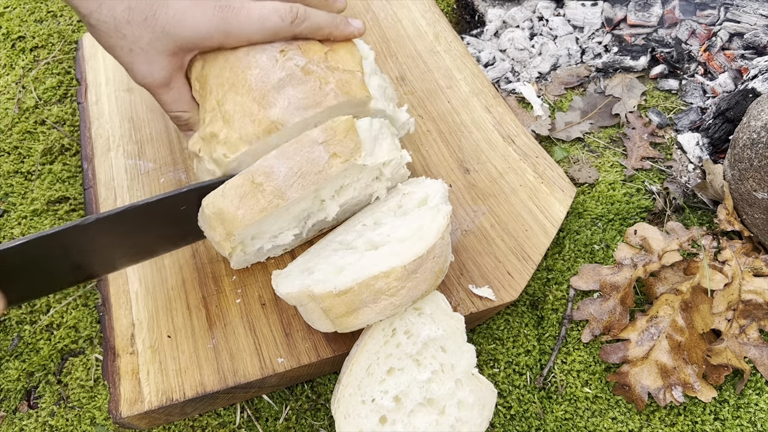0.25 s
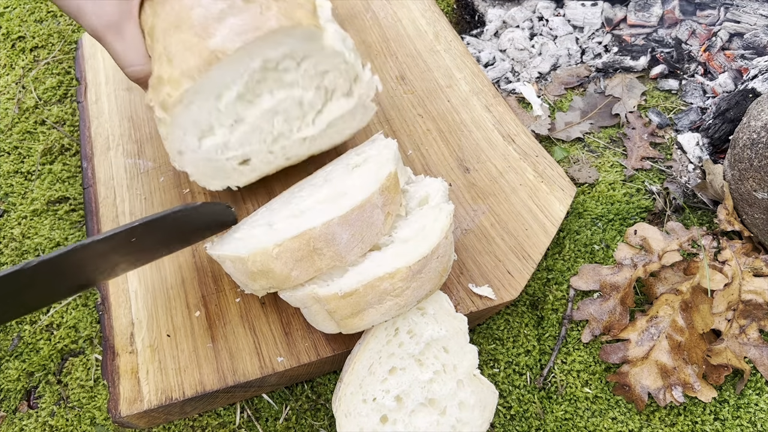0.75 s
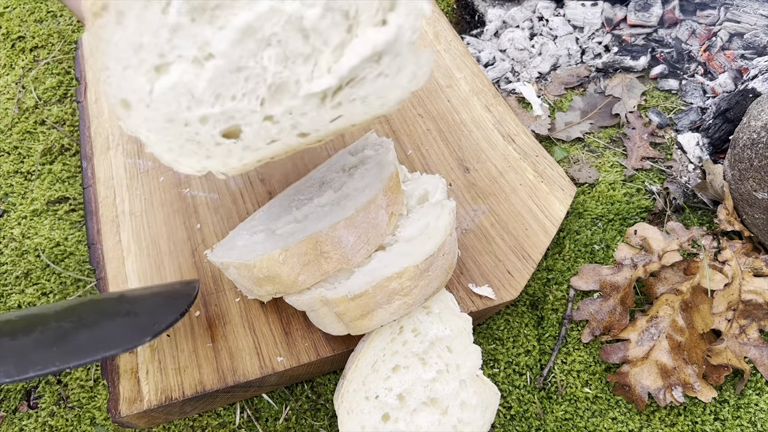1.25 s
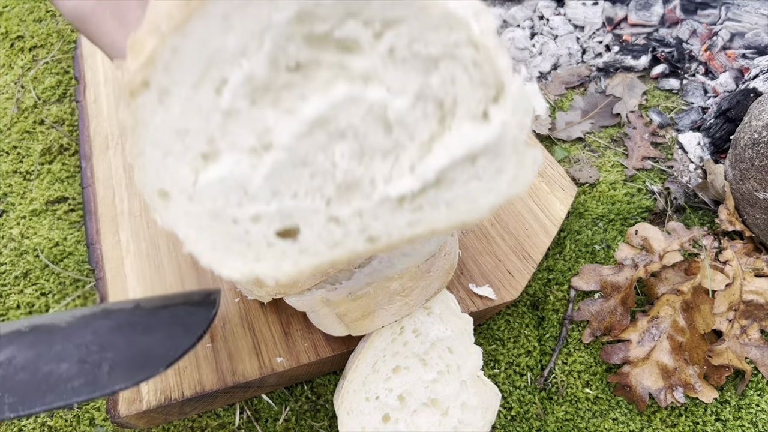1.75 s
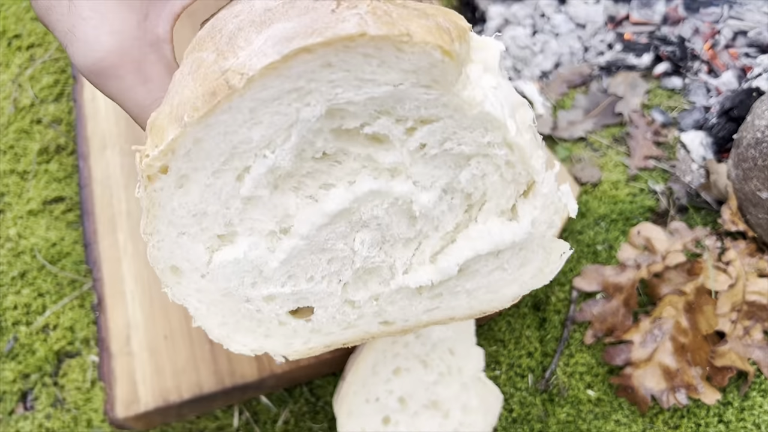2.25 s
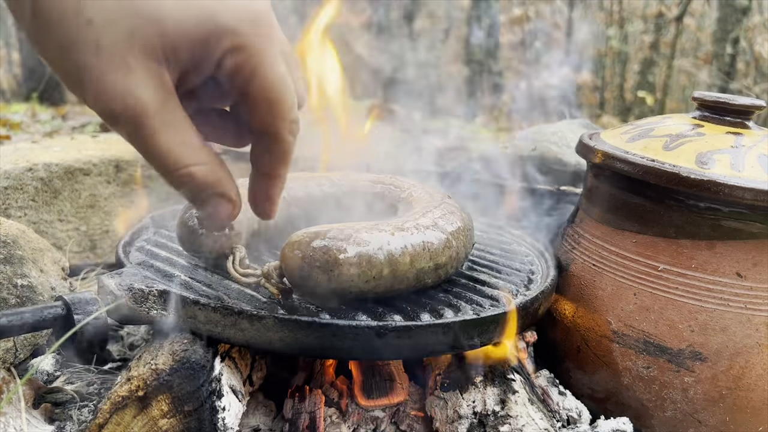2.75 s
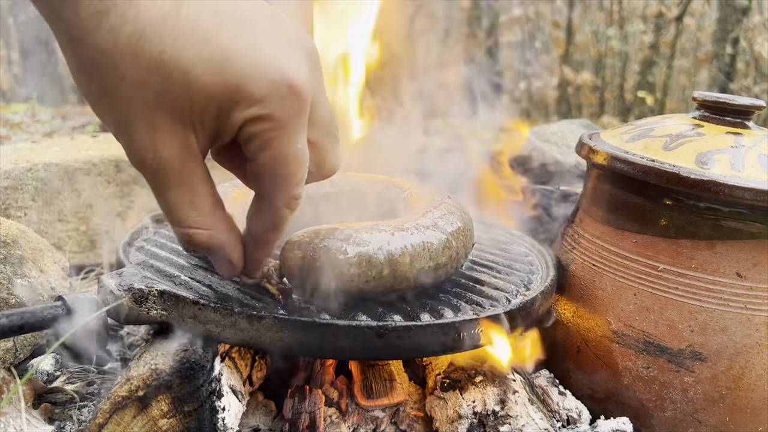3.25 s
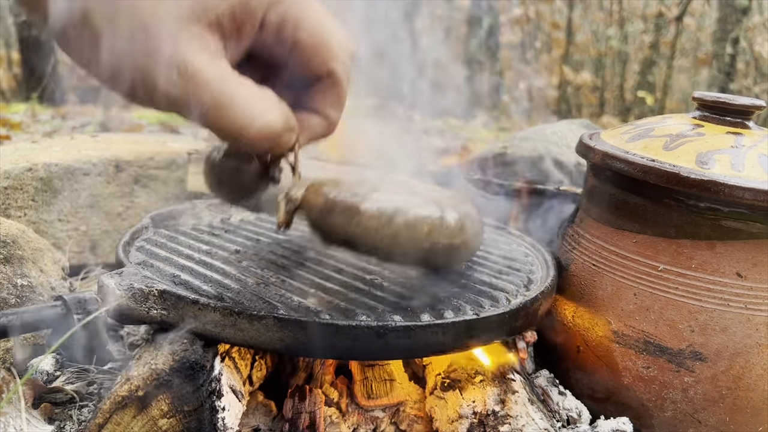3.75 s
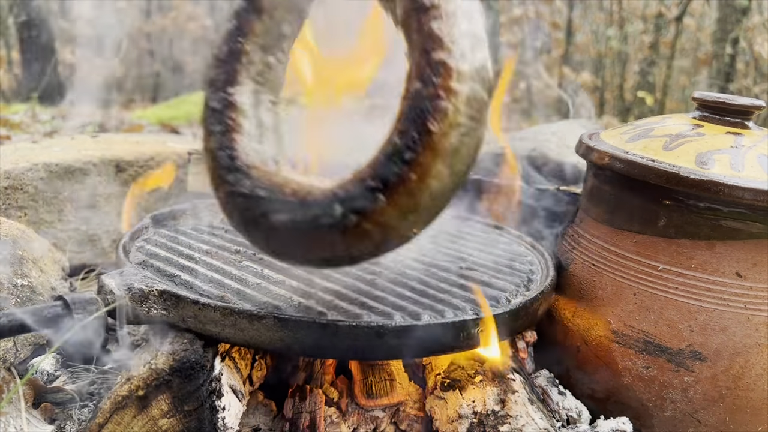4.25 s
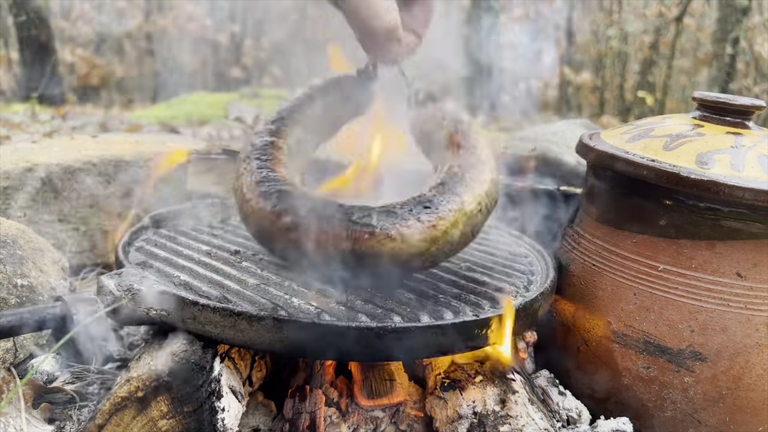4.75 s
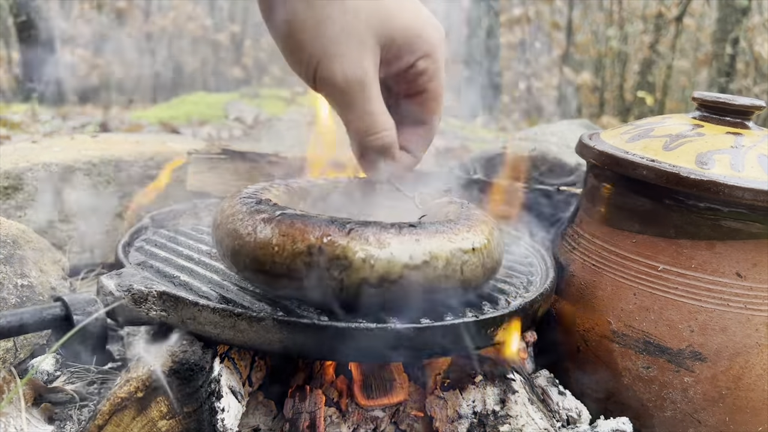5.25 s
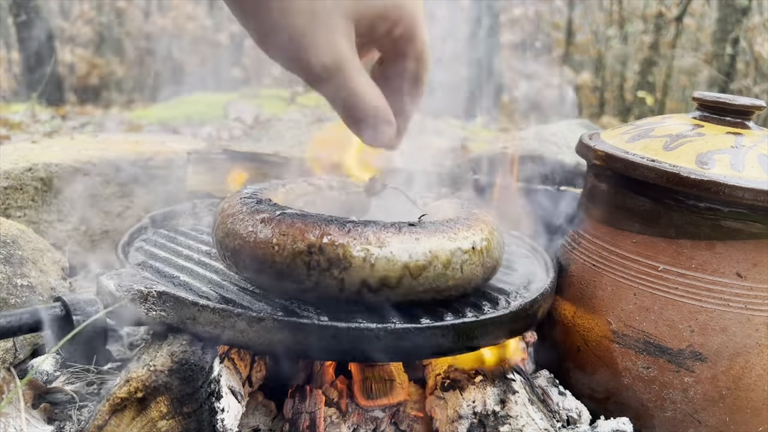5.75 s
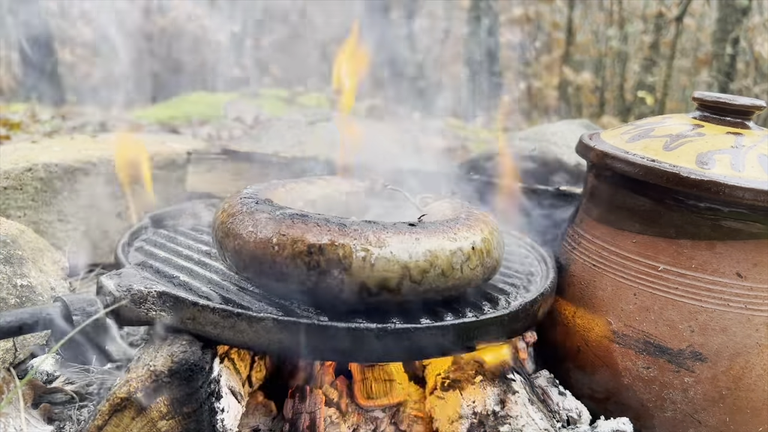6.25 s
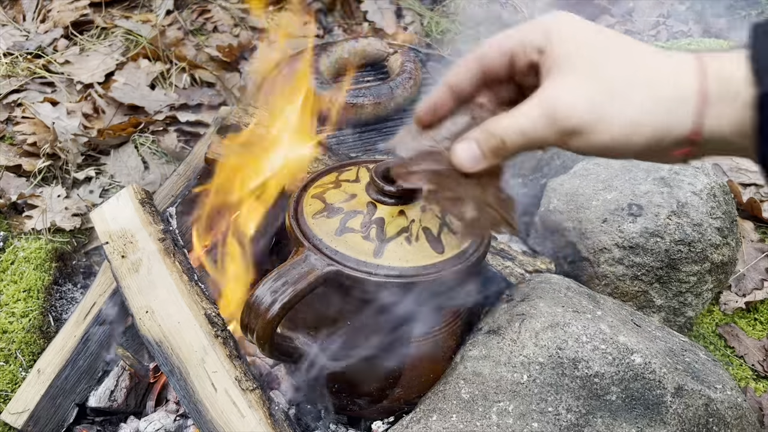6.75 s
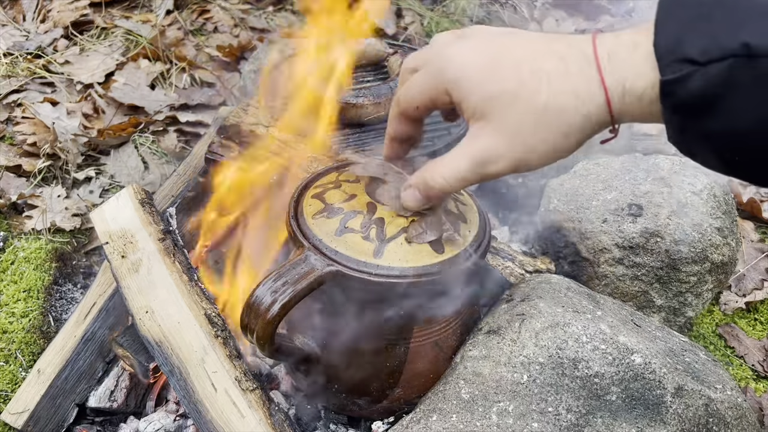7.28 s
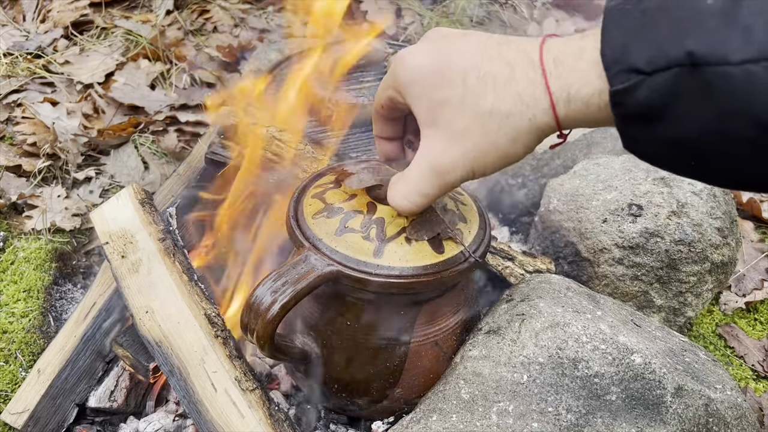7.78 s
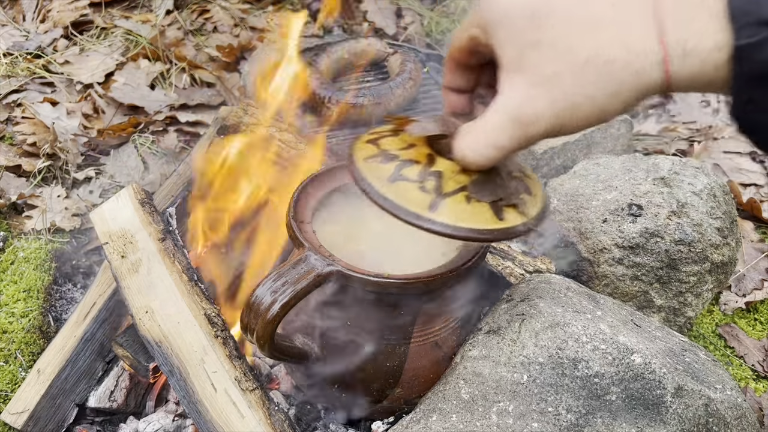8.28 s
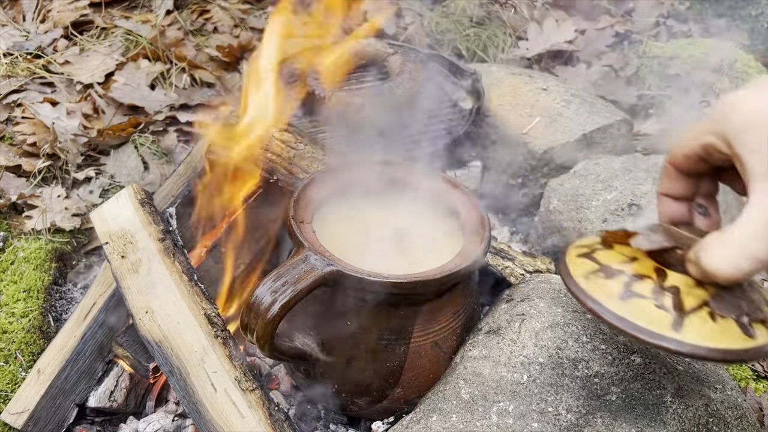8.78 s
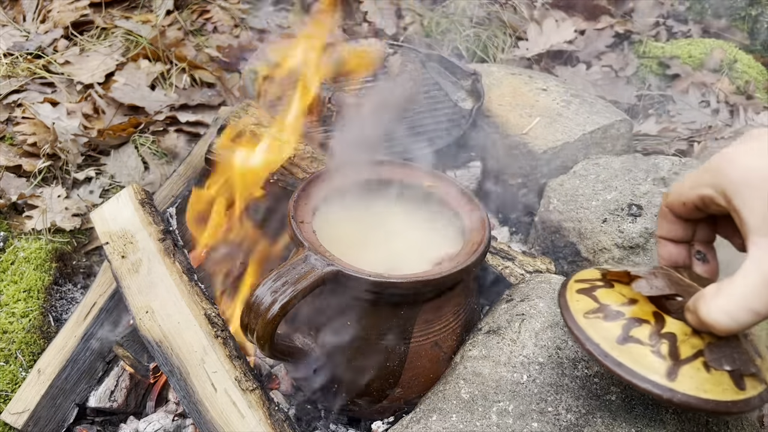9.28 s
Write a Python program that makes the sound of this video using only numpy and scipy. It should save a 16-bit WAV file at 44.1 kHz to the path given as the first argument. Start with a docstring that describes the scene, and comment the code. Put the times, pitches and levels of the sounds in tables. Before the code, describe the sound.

Three close, dry outdoor scenes in wide stereo. From 0 to 2.3 s a knife rasps through a crusty loaf, strongest in the first 0.3 s, with low rubbing on wood, soft bumps around 0.3-0.6 and near 1 s, and bright brittle crackling with sharp snaps continuing as the bread is lifted. At 2.3 s it cuts to a sausage on a griddle: dense bright fizz, coarse spatter and quick spurts, busiest around 3-3.6 s and again near 4.1 s, pops at 3.0, 3.4 and 4.4, a flame flap at 4.5, a steam hiss at 5.0-5.1 as it is laid down, then fading sizzle with spits and pops near 6 s. From 6.4 s a deeper fluttering fire rumbles under steady thin wood hiss, with scattered pops, a heavy crack at 7.6, a cluster with a flame puff as the lid lifts at 8.3, and tiny bubbles near 8.0, 9.0 and 9.4 s.

```python
"""Bread and sausage by a wood fire

Three scenes. A knife saws through a crusty loaf, the slice flops over and the crust crackles on: grains and rasps.
A sausage is turned on a hot griddle over a wood fire, its fat fizzing and spitting: grained noise, spurts and steam.
Then the fire alone rumbles, hisses and pops around a clay pot: fluttering noise, ticks and sharp fractures.
A few bubbles ring in the pot; the fire has short echoes, and both places are spread in stereo."""
import sys
import numpy as np
from scipy import signal
from scipy.fft import rfft, irfft, next_fast_len
from scipy.io import wavfile

SR = 44100
rng = np.random.default_rng(int(sys.argv[2]) if len(sys.argv) > 2 else 0)


def int16_out(signal):
    """Quantize to a 16-bit WAV file."""
    q = np.round(np.clip(np.atleast_2d(signal).T, -1, 1) * 32767)
    wavfile.write(sys.argv[1], SR, q.astype(np.int16))


N = 419832

# Start and end in seconds.
BREAD_SPAN_S, GRIDDLE_SPAN_S, POT_SPAN_S = (0, 2.305), (2.305, 6.376), (6.376, 9.53)
EDGE_HZ = 15850

# Crackling crust, loudest as the blade breaks through and as the loaf is gripped and lifted.
# Each row: time in seconds, level in dB before CRUST_LIFT_DB.
CRUST_LEVEL = [(0, -34), (.12, -43), (.44, -38), (.72, -36), (.87, -42), (1.18, -41), (1.44, -38.5),
               (1.6, -41.5), (1.78, -38), (1.98, -40.5), (2.29, -39.5)]
# Spectra of crust, crumb, blade and board. Each row: frequency in Hz, relative density in dB per Hz.
CRUST_SPECTRUM = [(2000, -29), (4200, -19.5), (6200, -17.5), (7600, -7.5), (8800, -6), (9800, -4.5),
                  (11500, -0.5), (13000, -8.5), (15700, -4)]
CRUMB_SPECTRUM = [(400, -12.5), (750, -13.5), (1400, -2.5), (2000, -1), (3000, 0), (4300, 0), (6500, 0.5),
                  (9000, -6.5)]
RASP_SPECTRUM = [(300, -14), (600, -12.5), (720, -4.5), (820, -4.5), (950, -12), (1200, -25), (2000, -13.5),
                 (3000, -33)]
RUB_SPECTRUM = [(20, -23), (45, 0), (80, -4), (150, -10.5), (350, -14), (600, -17.5), (1200, -11.5)]
# Strokes of the blade. Each row: start in seconds, length in seconds, level of the rasp in dB.
BLADE_STROKES = [(-.02, .3, -53), (0.55, 0.14, -63.5)]
STROKE_RISE_S, STROKE_FALL_DB_PER_S = 0.017, 110
CRUST_LIFT_DB = 5.0
# The loaf rubs on the board until the slice comes free, then settles in the hand.
FREE_S, RUB_DB, SETTLE_DB_PER_S, REST_DB = 0.54, -57, 15.5, -74
CRUMB_DB, CRUMB_FADE_DB_PER_S = -51, 2


def bread():
    """Crust crumbles in fine grains over rustling crumb; the blade rasps and the loaf rubs on the board."""
    t = times(BREAD_SPAN_S)
    flakes = grains(t, per_s=1100, spread_db=0.5, ring_s=0.00056, bed=0.16, shared=0.28)
    flakes = flakes * waver(t, per_s=46, depth_db=1.22)
    crust = amp(CRUST_LIFT_DB) * level(CRUST_LEVEL, t) * coloured(flakes, CRUST_SPECTRUM)

    fibres = grains(t, per_s=700, spread_db=3.0, ring_s=0.0012, bed=0.17, shared=0.81)
    fibres = patchy(fibres, width_hz=400, per_s=14, depth_db=1.8)
    crumb = held(t, CRUMB_DB, FREE_S, CRUMB_FADE_DB_PER_S) * coloured(fibres, CRUMB_SPECTRUM)

    slips = grains(t, per_s=410, spread_db=1, ring_s=.003, bed=0.93, shared=0.43)
    sawing = 0
    for s, length_s, db in BLADE_STROKES:
        rise = np.clip((t - s) / STROKE_RISE_S, 0, 1)
        sawing = sawing + rise * held(t, db, s + length_s, STROKE_FALL_DB_PER_S)
    blade = sawing * coloured(slips, RASP_SPECTRUM)

    rubbing = np.hypot(held(t, RUB_DB, FREE_S, SETTLE_DB_PER_S), amp(REST_DB))
    rubbing = rubbing * waver(t, per_s=7.4, depth_db=3.0)
    rub = rubbing * coloured(rng.standard_normal((2, len(t))), RUB_SPECTRUM)
    return t[0], crust + crumb + blade + rub


# Bread bumping on the board.
# Each row: centre in seconds, gain in dB, brightness as a factor on the thud's frequencies.
BOARD_BUMPS = [(.299, -9, 0.49), (0.434, -13, .4), (0.568, -6.5, 1.8), (.95, -11, .25), (1.096, -9, .25)]
# Each row: frequency in Hz, gain in dB.
THUD_RESPONSE = [(25, -12), (60, 3), (130, 2), (300, 3), (480, -5), (800, -15), (2000, -24), (6000, -26)]


def thud(s, db, brightness, size=2048):
    """A soft push of air with no ring."""
    push = np.outer([1, 0], signal.unit_impulse(size, "mid"))
    return s - size / 2 / SR, filtered(push, lambda hz: amp(db + read(THUD_RESPONSE, hz / brightness)))


# Frying fat swells as the sausage is gripped, lifted and laid down again, then dries off.
# Each row: time in seconds, fine fizz in dB before FIZZ_LIFT_DB, coarse spatter in dB before SPATTER_LIFT_DB.
FRYING_LEVEL = [(2.33, -34.5, -43), (2.36, -35.5, -47.5), (2.95, -32, -47), (3.03, -31.5, -44),
                (3.07, -32.5, -44), (3.59, -30, -44), (3.69, -36, -45), (4.15, -32.5, -35.5),
                (4.25, -36.5, -44.5), (4.58, -36.5, -43.5), (4.9, -38, -51), (5.12, -29.5, -52),
                (5.18, -33, -44), (5.9, -44.5, -53), (6.0, -42, -48), (6.014, -43.5, -51), (6.37, -46, -51)]
# Spectra. Each row: frequency in Hz, relative density in dB per Hz.
FIZZ_SPECTRUM = [(500, -23.5), (1000, -22.5), (1900, -19), (2600, -14.5), (3400, -12), (4200, -13),
                 (4900, -7), (6000, -4.5), (6700, -6.5), (8000, -1), (9300, -6), (11500, 1), (13000, -7),
                 (15700, -2)]
SPATTER_SPECTRUM = [(300, -12.5), (500, -6.5), (700, -9.5), (1200, -7.5), (1900, -5.5), (2600, -1),
                    (3400, 3), (4200, -2.5), (5000, 1.5), (5800, -8.5), (6700, -3), (8000, -5),
                    (15000, -29)]
# Big spurts of fat flashing to steam.
# Each row: centre in seconds, half-length to 1/e of the power in seconds, level in dB before spectral shaping.
BIG_SPURTS = [(2.373, .004, -23.5), (2.877, 0.025, -33.5), (3.032, 0.0087, -25), (3.199, .008, -25.5),
              (3.271, .005, -24.5), (3.33, .004, -23), (3.382, .004, -23), (3.487, 0.0049, -26.5),
              (4.08, 0.0037, -25), (4.14, .004, -26), (5.939, 0.0064, -30), (6.052, .003, -35),
              (6.087, 0.0067, -35)]
FIZZ_LIFT_DB, SPATTER_LIFT_DB = 3.5, 1.9
SMALL_SPURTS_PER_S, SMALL_SPURT_S, SMALL_SPURT_DB = 9, 0.004, -35


def sausage():
    """Tiny bubbles fizz and surge in spurts, small ones at random; larger drops spatter on the bare iron."""
    t = times(GRIDDLE_SPAN_S)
    starts = t[rng.random(len(t)) < SMALL_SPURTS_PER_S / SR]
    small = [(s, SMALL_SPURT_S, SMALL_SPURT_DB) for s in starts]
    spurt_power = 0
    for s, length_s, db in list(BIG_SPURTS) + small:
        spurt_power = spurt_power + amp(db) ** 2 * np.exp(-((t - s) / length_s) ** 2)
    boiling = np.sqrt((amp(FIZZ_LIFT_DB) * level(FRYING_LEVEL, t)) ** 2 + spurt_power)

    bubbles = grains(t, per_s=1500, spread_db=3.5, ring_s=0.0012, bed=0.34, shared=0.33)
    bubbles = bubbles * waver(t, per_s=25, depth_db=0.93)
    fizz = boiling * coloured(patchy(bubbles, width_hz=600, per_s=12.4, depth_db=1.3), FIZZ_SPECTRUM)

    drops = grains(t, per_s=650, spread_db=3.5, ring_s=0.00076, bed=0.19, shared=0.8)
    drops = patchy(drops, width_hz=280, per_s=9.4, depth_db=1.5)
    spattering = amp(SPATTER_LIFT_DB) * level(FRYING_LEVEL, t, axis=2)
    return t[0], fizz + spattering * coloured(drops, SPATTER_SPECTRUM)


# Steam squeezed through a narrow gap, under the sausage or the lid.
# Each row: centre in seconds, Gaussian half-length in seconds, pitch in Hz, level in dB.
STEAM_JETS = [(5.0, 0.046, 5700, -44), (5.053, .012, 8100, -36), (6.073, 0.036, 5760, -42.5),
              (8.25, .03, 5100, -52)]
STEAM_HALF_WIDTH_HZ = 380


def steam(s, length_s, hz_centre, db, size=16384):
    """A short jet of steam: a swell of narrow, half-whistling hiss."""
    t = (np.arange(size) - size / 2) / SR
    noise = rng.standard_normal((2, size))
    jet = filtered(noise, lambda hz: 1 / (1 + ((hz - hz_centre) / STEAM_HALF_WIDTH_HZ) ** 2))
    return s + t[0], amp(db) * np.exp(-(t / length_s) ** 2 / 2) * evened(jet)


# Crust snapping. Each row: time in seconds, snap (1.5 kHz) in dB, crack (about 8 kHz) in dB.
CRUST_SNAPS = [(.152, -23, -8), (.342, -19, -14), (.429, -38, -7), (.5675, -13, -15), (1.4467, -36, -9),
               (1.48, -17, -10), (1.522, -42, -8), (1.692, -42, -4), (1.9075, -26, -4)]
CRUST_THUMP_RE_CRACK_DB = -24.5
# Wood or fat popping.
# Each row: time in seconds, thump (330 Hz) in dB, snap (1.5 kHz) in dB, crack (about 8 kHz) in dB.
FIRE_POPS = [(3.0028, -7, -11, -4), (3.3609, 3, -16, 1.5), (4.0198, -2, -4.5, -13), (4.139, -15, -3, -4),
             (4.4257, 3.5, -5.5, -1), (5.9307, -16, -9, 6.5), (5.934, -4, -12, -2), (6.0104, -1, -10, -23),
             (6.0315, -13, -17, -1.5), (6.1305, 2.5, -11, -6.5), (6.3176, -13, -16, -8.5),
             (6.4662, -9, -13, -4.5), (6.657, -10, -4, -5), (6.6811, 5.5, -10.5, -27), (6.969, -7, -12, 0),
             (7.1485, -8, -25, -7.5), (7.426, -13, -22, -8), (7.4461, -20, -28, -5), (7.533, -11, -17, -9),
             (7.5779, -5, -11, -13), (7.6092, 16.5, 1, 6.5), (8.25, -1, -4, -12.5), (8.2554, -12, -18, -22),
             (8.2826, 6.5, -5, -4.5), (8.4152, -12, -15, -11), (8.9109, -4, -11.5, -13),
             (9.211, -10, -18, -22)]


def pop(s, thump_db, snap_db, crack_db, splinters, top_db, ring_s=0.00077, tail_db=-19, tail_s=0.0046):
    """A fracture: one pressure step for the lows, a splintering burst with a faint tail for the highs."""
    t = np.arange(len(splinters[0])) / SR - .02  # room for the filters before the onset
    after = np.maximum(t, 0)
    decay = np.exp(-after / ring_s) + amp(tail_db) * np.exp(-after / tail_s)
    burst = splinters * (t >= 0) * decay
    burst /= np.linalg.norm(burst[0])
    step = np.outer([1, 0], signal.unit_impulse(len(t), np.argmax(t >= 0)))
    colour = [(30, thump_db - 28), (85, thump_db - 12), (140, thump_db + 3), (330, thump_db),
              (1500, snap_db), (3000, (snap_db + crack_db) / 2 - 3.5), (8000, crack_db - 0.5),
              (11500, crack_db + top_db), (16000, crack_db + top_db - 17)]
    low = lambda hz: 1 / (1 + (hz / 4500) ** 4)
    push = filtered(step, lambda hz: amp(read(colour, hz)) * np.sqrt(low(hz)))
    crack = filtered(burst, lambda hz: amp(read(colour, hz)) * np.sqrt(1 - low(hz)))
    early = max(-round((s + t[0]) * SR), 0)  # samples before time zero
    return s + t[0], (push + crack)[:, early:]


# Bubbles bursting in the simmering pot.
# Each row: start in seconds, nominal pitch in Hz, envelope peak in dB.
POT_BUBBLES = [(8.031, 1100, -47), (8.984, 1220, -43), (9.403, 980, -46), (9.453, 1390, -42)]


def bubble(s, hz, db, life_s=0.0017, rise=0.14, size=2048):
    """A bubble rings for a few cycles, rising as it opens."""
    t = np.arange(size) / SR
    age = t / life_s
    bend = 1 + rise * (np.tanh(age / 4) - .5)
    ring = age * np.exp(1 - age) * np.sin(2 * np.pi * hz * t * bend)
    return s, amp(db) * np.outer([1, 0], ring)


# Hiss of the wood. Each row: frequency in Hz, relative density in dB per Hz.
WOOD_SPECTRUM = [(450, -1.5), (700, -2), (1000, -4.5), (1400, 0.5), (2200, -2), (3100, 1.5), (3700, -0.5),
                 (5200, 1), (6900, 0), (8100, 1.3), (9700, -0.5), (11300, 0.5), (13000, -10), (15700, -2)]
# Jets of sap whistling faintly in the logs.
# Each row: centre in Hz, half-width at half gain in Hz, level in dB.
SAP_JETS = [(976, 200, -63), (3110, 87, -64.5), (3970, 230, -67), (4800, 490, -68), (6260, 180, -65),
            (8140, 400, -61)]


def logs(hiss_db=-49):
    """Burning wood hisses among faint ticks; each jet of sap wavers a little by itself."""
    t = times(POT_SPAN_S)
    ticks = grains(t, per_s=70, spread_db=1.0, ring_s=0.00076, bed=0.74, shared=0.64)
    ticks = ticks * waver(t, per_s=18, depth_db=1.5)
    out = amp(hiss_db) * coloured(patchy(ticks, width_hz=590, per_s=8, depth_db=1.6), WOOD_SPECTRUM)
    for centre, width, db in SAP_JETS:
        noise = rng.standard_normal((2, len(t)))
        jet = filtered(noise, lambda hz: 1 / (1 + ((hz - centre) / width) ** 2))
        out += amp(db) * evened(jet) * waver(t, per_s=12, depth_db=2.2)
    return t[0], out


# Flames flapping in gusts.
# Each row: centre in seconds, length in seconds (the swell spans 1.26 of it), level in dB.
FLAME_FLAPS = [(2.476, .011, -33), (2.827, 0.058, -34), (3.353, 0.055, -38), (4.533, 0.049, -32.5),
               (6.016, 0.043, -38.5), (6.097, .009, -37.5), (8.276, .03, -36.5)]
# Each row: frequency in Hz, relative density in dB per Hz.
GUST_SPECTRUM = [(35, -5), (70, 8.5), (140, 8.5), (350, 0), (480, -6), (650, -16), (1300, -16)]


def flap(s, length_s, db, size=8192):
    """A gust tears the flame: a short swell of low turbulence."""
    t = (np.arange(size) - size / 2) / SR
    swell = np.cos(np.pi * np.clip(t / (1.26 * length_s), -.5, .5))
    gust = coloured(rng.standard_normal((2, size)) * swell, GUST_SPECTRUM)
    return s + t[0], amp(db) * gust * np.sqrt(np.mean(swell ** 2) / np.mean(gust[0] ** 2))


def licks(per_s=11, lick_db=-8):
    """Small tongues of flame flick at random under the griddle: impulses coloured like the gusts."""
    t = times(GRIDDLE_SPAN_S)
    flicks = rng.uniform(-1, 1, len(t)) * (rng.random(len(t)) < per_s / SR)
    return t[0], filtered(np.outer([1, 0], flicks), lambda hz: amp(lick_db + read(GUST_SPECTRUM, hz)))


# Flames under the griddle and, stronger, around the pot.
# Each row: frequency in Hz, relative density in dB per Hz.
GRIDDLE_ROAR_SPECTRUM = [(20, -25.3), (35, -13), (48, -7), (66, 4), (85, -1.5), (110, -4), (160, -5.5),
                         (220, -10), (320, -15), (450, -17.5), (700, -27.5)]
POT_ROAR_SPECTRUM = [(20, -26), (35, -16), (48, -11.5), (66, 2), (85, -4), (110, -8.5), (160, -10.5),
                     (220, -20.5), (320, -22.5), (450, -35), (700, -42.5)]
GRIDDLE_FLAME_DB, POT_FLAME_DB = -48.5, -42.5


def roar(span_s, flame_db, spectrum, flutter_hz, flutter_db):
    """Turbulent flames: a steady deep rumble whose upper part flutters."""
    t = times(span_s)
    churn = rng.standard_normal((2, len(t)))
    deep = filtered(churn, lambda hz: 1 / (1 + (hz / 120) ** 4))
    churn = deep + (churn - deep) * waver(t, flutter_hz, flutter_db)
    return t[0], amp(flame_db) * coloured(churn, spectrum)


# Echoes off the griddle, pot and stones.
# Each row: delay in seconds, left and right gain as factors before the reach filter.
FIRE_ECHOES = [(.0011, 0.00023, .08), (.0029, 0.0083, 0.049), (.0047, .1, -.08), (.0078, 0.05, 0.058)]


def hearth(x):
    """Hard things close to the fire throw back a few short echoes, mostly in the middle range."""
    delay, *gains = np.transpose(FIRE_ECHOES)
    reach = lambda hz: hz / (hz + 500) / (1 + (hz / 8500) ** 8)
    echoes = lambda hz: np.array(gains) @ np.exp(-2j * np.pi * np.outer(delay, hz))
    return filtered(x, lambda hz: 1 + reach(hz) * echoes(hz))


# Stereo places, before the port scaling of 0.86 left and 0.92 right.
# Each row: frequency in Hz, left minus right in dB, diffuse side share, right's phase lead in radians.
BOARD_PLACE = [(100, 1, 0.12, 0), (700, 1, 0.41, 0.71), (1800, -0.5, 0.45, 0.61), (2780, 0, 0.036, 0.86),
               (4200, 1.5, 0.083, 0.037), (5200, 6, 0.7, 0.14), (6200, 2, 0.51, -0.084),
               (7500, -1, 0.44, -0.96), (8700, -.8, 0.32, 0.37), (9700, 0, 0.041, 0.2)]
FIRE_PLACE = [(101, 0.4, 0.014, -0.08), (400, 0.2, 0.17, -0.33), (1200, 4, 0.35, -0.9),
              (1940, 5, 0.34, -0.93), (3050, 3.5, 0.91, -1.5), (5200, 9, 0.62, -0.089),
              (6700, 4, 0.63, 0.97), (7350, 4, .4, 0.59), (8500, 0.5, 0.29, 0.39),
              (9600, -0.5, 0.014, 0.36)]
# Top-octave phase lead of the right channel. Each row: frequency in Hz, turns before the port scaling.
TOP_TWIST = [(8500, 0), (10150, .5), (11800, 1), (12300, 1), (13800, 1.5), (15300, 2)]


def placed(sound, place, scatter=0.036):
    """Mid and side to left and right; in the top octave the two channels turn against each other."""
    def port(sign):
        def response(hz):
            twist = 2 * np.pi * np.interp(hz, *np.transpose(TOP_TWIST))
            diffuse = read(place, hz, axis=2) + scatter * abs(np.sin(twist))
            lean = amp(read(place, hz))
            gain = lean ** (sign / 2) / np.sqrt((lean + 1 / lean) / 2 * (1 + diffuse ** 2))
            turn = np.exp(-.5j * sign * (twist + read(place, hz, axis=3)))
            return np.array([np.ones_like(hz), sign * diffuse]) * gain * turn
        return filtered(sound, response).sum(0)
    return np.array([port(0.86), port(-0.92)])


def grains(t, per_s, spread_db, ring_s, bed, shared, count=8):
    """White crackle as mid and side: tiny bursts, broadband or per band, over a bed of countless fainter ones."""
    def bursts():
        size = amp(spread_db * np.minimum(rng.exponential(1, len(t)), 5))
        power = size ** 2 * (rng.random(len(t)) < per_s / SR)
        power = signal.lfilter([1], [1, -np.exp(-2 / (ring_s * SR))], power)
        return power / (power.mean() + 1e-20)

    bed, shared = np.clip([bed, shared], 0, 1)
    broad, out = bursts(), 0
    for band in range(count):
        power = bed + (1 - bed) * (shared * broad + (1 - shared) * bursts())

        def window(hz):
            position = np.sqrt(np.minimum(hz / EDGE_HZ, 1)) * (count - 1)
            return np.cos(np.pi / 2 * np.clip(position - band, -1, 1))
        out = out + filtered(np.sqrt(power) * rng.standard_normal((2, len(t))), window)
    return out


def patchy(x, width_hz, per_s, depth_db, size=1024):
    """Lets narrow bands of a hiss swell and fade, each by itself."""
    hz, t, z = signal.stft(x, SR, nperseg=size)
    across, along = np.fft.fftfreq(len(hz), hz[1])[:, None], np.fft.fftfreq(len(t), t[1])
    blur = np.exp(-(across * width_hz) ** 2 - (along / per_s) ** 2)
    patches = np.fft.ifft2(np.fft.fft2(rng.standard_normal(z.shape[1:])) * blur).real
    z = z * amp(depth_db * evened(patches))
    return signal.istft(z, SR, nperseg=size)[1][:, :x.shape[1]]


def waver(t, per_s, depth_db):
    """A gain that wanders at random."""
    slow = filtered(rng.standard_normal(len(t)), lambda hz: np.exp(-(hz / per_s) ** 2))
    return evened(amp(depth_db * evened(slow)))


def held(t, db, until_s, fall_db_per_s):
    """A gain that holds, then dies away."""
    return amp(db - fall_db_per_s * np.maximum(t - until_s, 0))


def coloured(x, spectrum):
    """Gives noise a spectrum that falls away past both ends, at rms 1."""
    def response(hz):
        below = np.minimum(hz / spectrum[0][0], 1) ** 2
        above = np.maximum(hz / spectrum[-1][0], 1) ** 2
        return amp(read(spectrum, hz)) * below / above
    return evened(filtered(x, response))


def filtered(x, response):
    """Filters by a response given as a function of Hz."""
    size = next_fast_len(x.shape[-1] + 4096)
    return irfft(rfft(x, size) * response(np.fft.rfftfreq(size, 1 / SR)), size)[..., :x.shape[-1]]


def amp(db):
    """Decibels to gain."""
    return 10 ** (np.asarray(db) / 20)


def evened(x):
    """Scales to rms 1."""
    return x / np.sqrt(np.mean(x ** 2) + 1e-20)


def read(points, hz, axis=1):
    """One column of a table, along a logarithmic frequency axis."""
    points = np.array(points)
    return np.interp(np.log(hz + 1), np.log(points[:, 0] + 1), points[:, axis])


def level(curve, t, axis=1):
    """One dB column of a curve as a gain at the times t."""
    curve = np.array(curve)
    return amp(np.interp(t, curve[:, 0], curve[:, axis]))


def times(span_s):
    """The sample times of a span."""
    return np.arange(round(span_s[0] * SR), round(span_s[1] * SR)) / SR


def add(mix, s, sound):
    """Mixes a sound in from time s."""
    part = mix[:, max(round(s * SR), 0):][:, :sound.shape[1]]
    part += sound[:, :part.shape[1]]


def scene(size=4096):
    """The cutting board, then the fire."""
    board, fire = np.zeros((2, 2, N))
    add(board, *bread())
    for row in BOARD_BUMPS:
        add(board, *thud(*row))
    for s, snap_db, crack_db in CRUST_SNAPS:
        thump_db = crack_db + CRUST_THUMP_RE_CRACK_DB
        add(board, *pop(s, thump_db, snap_db, crack_db, rng.standard_normal((2, size)), top_db=10.5))
    add(fire, *sausage())
    for row in STEAM_JETS:
        add(fire, *steam(*row))
    for row in FIRE_POPS:
        add(fire, *pop(*row, rng.standard_normal((2, size)), top_db=-3.5))
    for row in POT_BUBBLES:
        add(fire, *bubble(*row))
    add(fire, *logs())
    for row in FLAME_FLAPS:
        add(fire, *flap(*row))
    add(fire, *licks())
    add(fire, *roar(GRIDDLE_SPAN_S, GRIDDLE_FLAME_DB, GRIDDLE_ROAR_SPECTRUM, flutter_hz=35, flutter_db=6))
    add(fire, *roar(POT_SPAN_S, POT_FLAME_DB, POT_ROAR_SPECTRUM, flutter_hz=35, flutter_db=3.5))
    return placed(board, BOARD_PLACE) + hearth(placed(fire, FIRE_PLACE))


LAG_TURNS, KNEE_HZ = 1.15, 40


def record(dry):
    """The microphone chain delays the bass by about a cycle, so each pop sweeps downward; then the band limit."""
    swept = filtered(dry, lambda hz: np.exp(-2j * np.pi * LAG_TURNS * np.log((hz + KNEE_HZ) / EDGE_HZ)))
    lowpass = signal.firwin(511, EDGE_HZ, window=("kaiser", 9), fs=SR)
    return signal.oaconvolve(swept, lowpass[None], "same")


dry = scene()
out = record(dry)
int16_out(out)
```